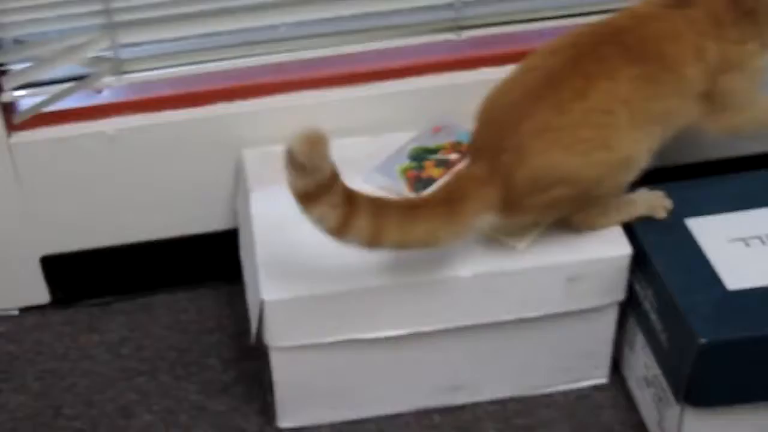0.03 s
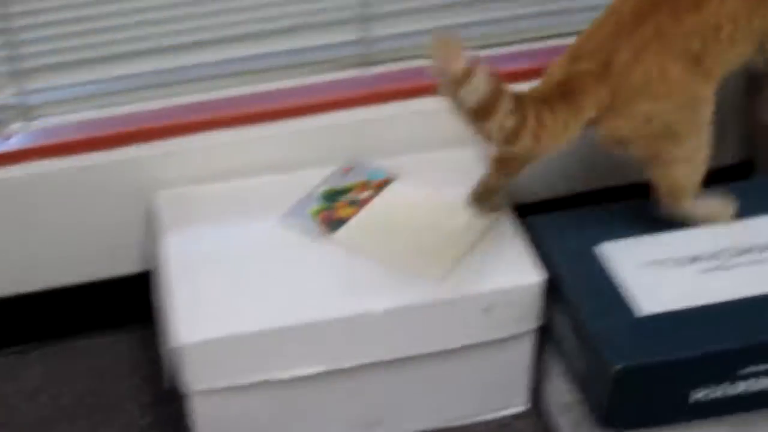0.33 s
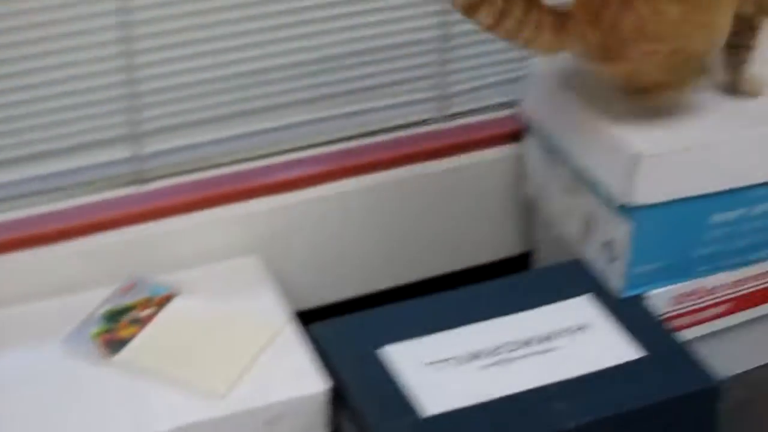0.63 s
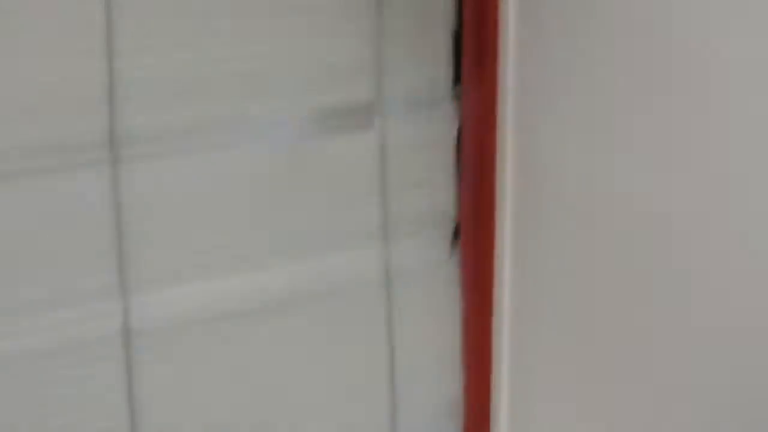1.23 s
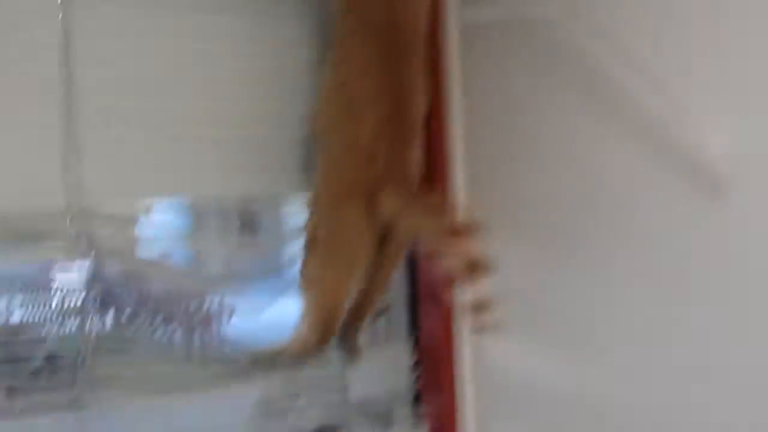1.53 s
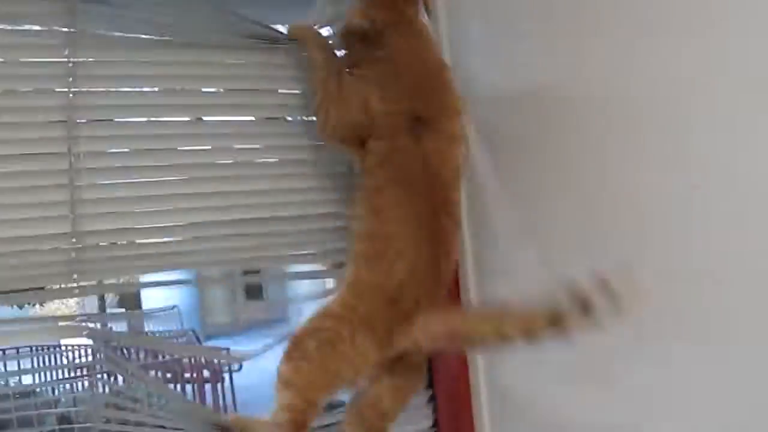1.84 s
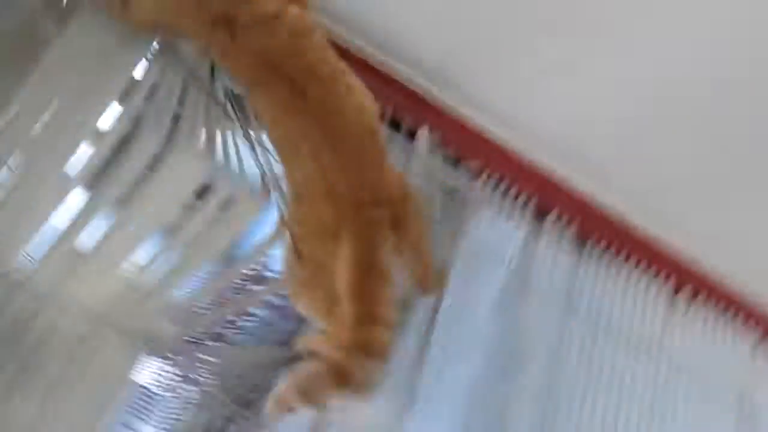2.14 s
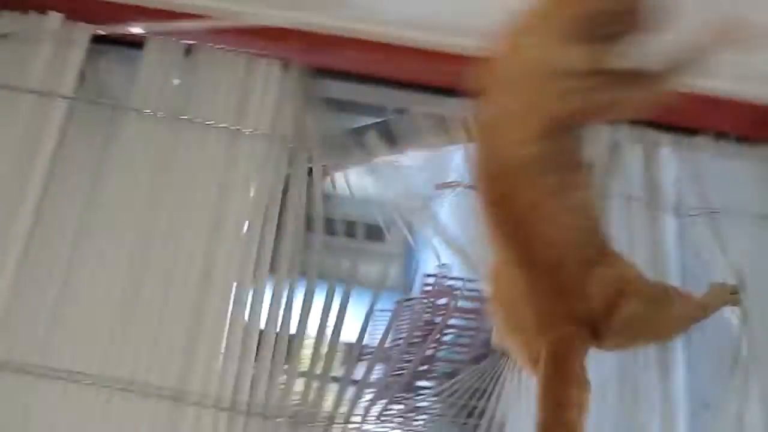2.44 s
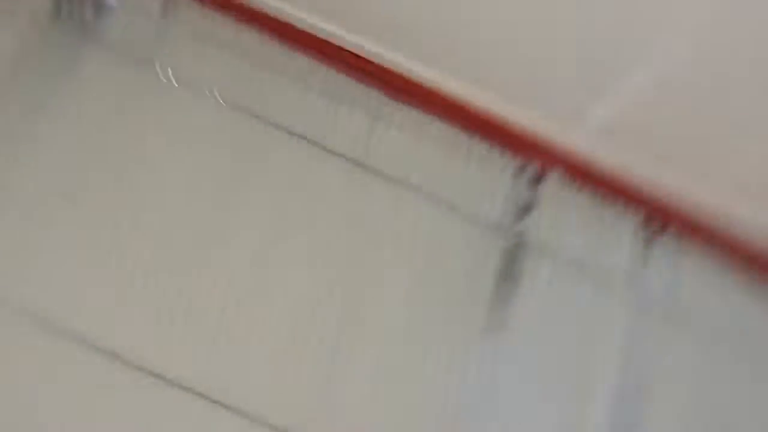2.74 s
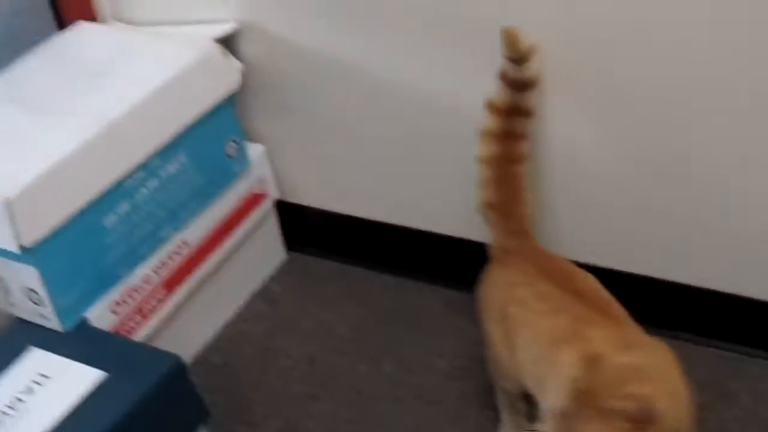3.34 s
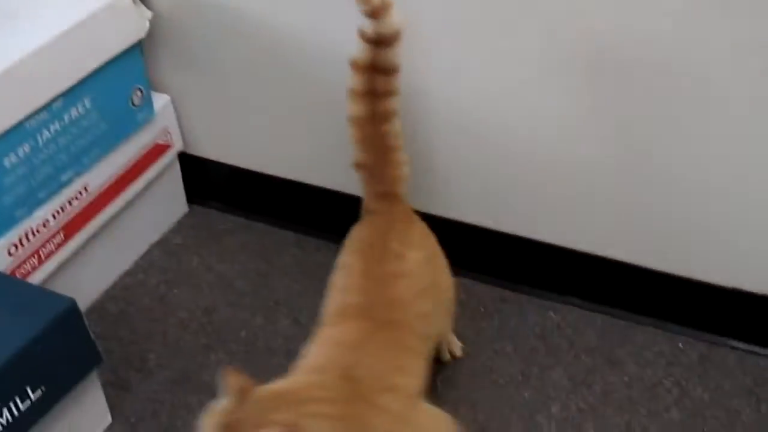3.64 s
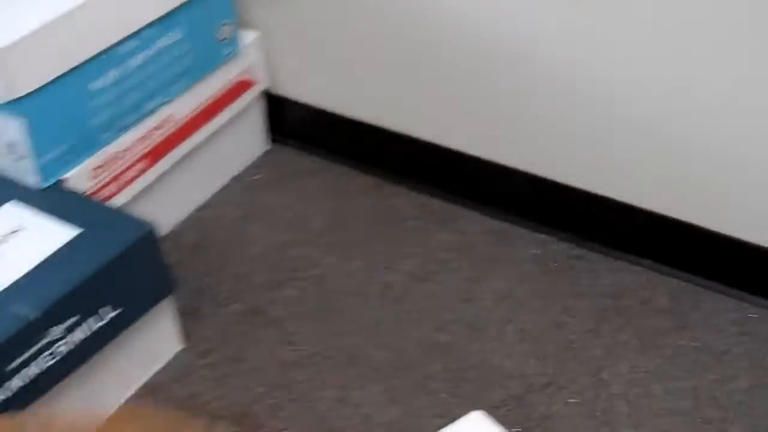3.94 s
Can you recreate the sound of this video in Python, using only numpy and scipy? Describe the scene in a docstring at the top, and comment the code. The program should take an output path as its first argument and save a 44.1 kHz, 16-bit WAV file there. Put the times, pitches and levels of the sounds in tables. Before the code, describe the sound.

A metal window blind clatters in dense bursts as a cat scrambles up it, just after thumping across cardboard boxes in a small office. The cat lands softly on carpet, and a smooth sliding hiss swells.

```python
"""A small office: a cat bounds over cardboard boxes, leaps into a metal window blind and scrambles up.
Paws thump the lids; the slats clash in dense bursts, snap, squeak and ring the head rail,
and the blind bumps the window. The cat drops back down to the carpet,
and a smooth sliding hiss with a faint sinking hum swells up."""
import sys
import numpy as np
from scipy import signal
from scipy.fft import rfft, irfft
from scipy.io import wavfile
from scipy.ndimage import uniform_filter1d, minimum_filter1d

SR = 44100
rng = np.random.default_rng(int(sys.argv[2]) if len(sys.argv) > 2 else 0)


def put_to_file(sound):
    """Save the sound as 16-bit audio at rate SR, in the file named by the first command-line argument."""
    columns = np.atleast_2d(sound).T  # one column per channel
    safe = np.clip(columns, -1, 1)
    whole_steps = np.round(safe * 32767)
    wavfile.write(sys.argv[1], SR, whole_steps.astype(np.int16))


N = 176400
T = np.arange(N) / SR

# Dull knock of paws and window bumps. Each row: frequency in Hz, relative level in dB.
KNOCK_SPECTRUM = [(35, -20), (80, -41), (120, -6), (230, -1.5), (320, -4), (540, -2.5), (750, -8.5),
                  (1100, -11.5), (1800, -22.5), (4000, -52.5)]


def undb(db):
    return 10 ** (np.asarray(db) / 20)


def unit(x):
    """Scale to rms 1."""
    return x / np.sqrt(np.mean(x ** 2))


def curve(rows, column=1):
    """One table column, linearly interpolated in time."""
    rows = np.array(rows)
    return np.interp(T, rows[:, 0], rows[:, column])


def add(out, start_s, sound):
    start = int(start_s * SR)
    out[start:start + len(sound)] += sound[:N - start]


def convolve(x, response):
    return signal.fftconvolve(x, response)[:N]


def colour(x, spectrum, keep_power=True):
    """Minimum-phase filter through (Hz, dB) points."""
    size = 4096
    hz, db = np.array(spectrum).T
    gain = undb(np.interp(np.log(np.fft.rfftfreq(size, 1 / SR) + 1), np.log(hz), db))
    cepstrum = irfft(np.log(unit(gain) if keep_power else gain))
    cepstrum[1:size // 2] *= 2
    cepstrum[size // 2 + 1:] = 0
    return convolve(x, irfft(np.exp(rfft(cepstrum))))


def clicks(per_s, scatter_db):
    """Random contacts of uneven size, with steady power over 40 ms."""
    hits = rng.random(N) < per_s / SR
    x = hits * undb(scatter_db * rng.standard_normal(N)) * rng.choice([-1, 1], N)
    return x / np.sqrt(uniform_filter1d(x ** 2, size=1764) + 1e-4)


def ring(modes):
    """Half a second of decaying modes (Hz, dB, t60 s)."""
    t = T[:SR // 2]
    return sum(undb(db) * np.sin(2 * np.pi * hz * t) * np.exp(-np.log(1000) * t / t60_s)
               for hz, db, t60_s in modes)


def bursts(contacts, swell_share=0):
    """Decaying noise per contact (start s, dB, decay s), swelling for a share of its decay."""
    power = np.zeros(N)
    t = T[:SR // 2]
    for start_s, db, decay_s in contacts:
        swell = np.minimum(t / (swell_share * decay_s + 1 / SR), 1)
        add(power, start_s, (undb(db) * swell * np.exp(-t / decay_s)) ** 2)
    return np.sqrt(power) * rng.standard_normal(N)


def waver(smooth_samples, length=N):
    """Smoothed noise, rms 1."""
    return unit(uniform_filter1d(rng.standard_normal(length), size=smooth_samples))


def tail(decay_s):
    """Scattered reflections with unit energy."""
    t = T[:SR // 2]
    response = rng.standard_normal(len(t)) * np.exp(-t / decay_s) * (1 - np.exp(-t * 10 / decay_s))
    return response / np.sqrt(np.sum(response ** 2))


def brushing():
    """Fur and feet brush the boxes between steps."""
    # Each row: time in seconds, level in dB.
    levels = [(.16, -100), (.178, -29.5), (.27, -36), (.33, -40.5), (.39, -34.5), (.46, -44), (.68, -45.5),
              (.95, -32.5), (1.05, -43)]
    # Each row: frequency in Hz, relative level in dB.
    spectrum = [(50, -21), (170, 9), (400, 7.5), (900, 1.5), (2700, -5), (4000, -15), (5500, -9.5),
                (8000, -12.5), (15000, -36)]
    touching = (T > levels[0][0]) & (T < levels[-1][0])
    return colour(clicks(per_s=3000, scatter_db=5.2) * undb(curve(levels)) * touching, spectrum)


def paws():
    """Paws boom, knock and scuff the box lids; the last two steps thud softly and scuff on the carpet."""
    # Each row: start in seconds, pitch in Hz, boom, knock and scuff in dB, contact in seconds.
    steps = [(.199, 216, -35, -19.5, -39, 0.0054), (0.292, 193, -25, -25, -30, 0.015),
             (0.399, 225, -27, -18.5, -26, 0.0032), (0.421, 187, -21, -47, -53, 0.0053),
             (.539, 175, -10.5, -17.5, -23, 0.0082), (0.697, 277, -17.5, -22.5, -33.5, 0.007),
             (.749, 192, -6, -11, -15.5, 0.0035), (0.807, 204, -29, -16.5, -20.5, 0.003),
             (0.874, 145, -16.5, -16.5, -21, 0.0066), (.990, 289, -10.5, -21, -21.5, 0.0085),
             (0.998, 149, -14.5, -19.5, -17, 0.017), (3.108, 534, -27, -36.5, -36.5, 0.054),
             (3.225, 426, -54, -58, -34.5, 0.015)]
    # Each row: multiple of the step's pitch, level in dB, t60 in seconds.
    boom_modes = [(0.602, -28, 0.65), (.82, -35, 0.28), (0.998, 1.5, 0.091), (1.27, -9, 0.18),
                  (2.72, -13, 0.17)]
    # Each row: frequency in Hz, relative level in dB.
    scuff_spectrum = [(300, -42), (900, -9), (1600, 6.5), (2600, 3), (4000, -13), (5500, -5.5), (8500, -14),
                      (15000, -40)]
    swell_share = 0.044  # padded paws press in gradually
    boom, knocks, scuffs = np.zeros(N), [], []
    for start_s, pitch_hz, boom_db, knock_db, scuff_db, contact_s in steps:
        modes = [(pitch_hz * ratio, db, t60_s) for ratio, db, t60_s in boom_modes]
        add(boom, start_s, undb(boom_db) * ring(modes))
        knocks.append((start_s, knock_db, 3.2 * contact_s))
        scuffs.append((start_s, scuff_db, contact_s))
    knock = colour(bursts(knocks, swell_share), KNOCK_SPECTRUM)
    scuff = colour(bursts(scuffs, swell_share), scuff_spectrum)
    return boom + knock + scuff


def snaps():
    """Claws and slats snap: short, bright noise bursts."""
    # Each row: start in seconds, level in dB, decay in seconds.
    contacts = [(.369, -24, 0.0061), (.411, -25, 0.0024), (.8067, -22.5, 0.002), (.969, -28, 0.018),
                (1.177, -10, 0.019), (1.222, -7.5, 0.0075), (1.558, -3.5, 0.0063), (1.592, -9, 0.0048),
                (1.741, -12, 0.025), (2.055, -8, 0.0049), (2.345, -18.5, 0.0077), (2.41, -15.5, 0.01)]
    # Each row: frequency in Hz, relative level in dB.
    spectrum = [(400, -15.5), (1400, -1.5), (2600, 4), (4000, -8.5), (5300, 0), (6400, 5), (8000, 0.5),
                (11000, -7.5), (15500, -22)]
    return colour(bursts(contacts), spectrum)


def squeaks():
    """Skidding claws and slat edges give thin, unsteady whistles with a weak octave."""
    # Each row: start and length in seconds, first and last pitch in Hz, level in dB.
    skids = [(0.802, 0.018, 7000, 6320, -32), (2.122, 0.0405, 6370, 6130, -21),
             (2.171, 0.096, 5830, 5800, -25.5), (2.64, 0.047, 9900, 10530, -22.5)]
    out = np.zeros(N)
    for start_s, length_s, first_hz, last_hz, db in skids:
        progress = np.clip((T - start_s) / length_s, 0, 1)
        pitch_hz = (first_hz + (last_hz - first_hz) * progress) * (1 + 0.03 * waver(40))
        phase = 2 * np.pi * np.cumsum(pitch_hz) / SR
        envelope = undb(db) * np.sqrt(np.abs(np.sin(np.pi * progress)))
        out += envelope * (np.sin(phase) + undb(-16) * np.sin(2 * phase))
    return out


def shaking():
    """Clash, clack and rattle envelopes: each pull or kick swells and settles; their powers add."""
    # Each row: start, rise and decay in seconds, then clash, clack and rattle in dB.
    shakes = [(0.973, 0.069, 0.07, -20, -22, -37), (1.101, 0.02, 0.083, -21, -24, -28.5),
              (1.197, 0.028, 0.099, -21.5, -20.5, -22), (1.365, 0.011, 0.017, -38, -25.5, -28.5),
              (1.473, 0.017, 0.61, -34.5, -33.5, -32.5), (1.581, 0.016, 0.062, -19.5, -20.5, -24.5),
              (1.673, 0.022, 0.069, -19.5, -17.5, -20.5), (1.74, 0.046, 0.07, -15, -21.5, -30.5),
              (1.871, 0.018, 0.063, -8.5, -13.5, -22), (1.935, 0.032, 0.083, -16.5, -22, -26.5),
              (2.05, 0.057, 0.095, -22.5, -23, -28), (2.17, 0.037, 0.12, -32, -34, -33),
              (2.335, 0.01, 0.17, -28.5, -34, -30.5), (2.411, 0.02, 0.16, -15.5, -17.5, -23),
              (2.424, 0.044, 0.038, -8.5, -12, -22), (2.519, 0.017, 0.091, -20, -21, -34),
              (2.63, 0.035, 0.39, -27, -32, -30), (2.712, 0.012, 0.062, -24, -22.5, -28),
              (2.824, 0.02, 0.082, -19, -22, -36.5), (2.899, 0.023, 0.041, -17.5, -22.5, -32)]
    rest_s = 0.27  # friction stops the slats about this long after a shake
    powers = np.zeros((3, N))
    t = T[:SR]
    for start_s, rise_s, decay_s, *levels_db in shakes:
        swell = np.minimum(t / rise_s, 1) ** 2
        settle = np.exp(-2 * np.maximum(t - rise_s, 0) / decay_s - (t / rest_s) ** 2)
        for power, db in zip(powers, levels_db):
            add(power, start_s, undb(db) ** 2 * swell * settle)
    return np.sqrt(powers)


def sway(depth_db=2, step_s=0.015):
    """Gain that wanders as slats meet and part."""
    knots = rng.standard_normal(1024)
    return undb(depth_db * np.interp(T / step_s, np.arange(len(knots)), knots))


def slats():
    """Shaken slats clash and clack in dense showers and rattle against the frame."""
    # Treble, mid and low spectra. Each row: frequency in Hz, relative level in dB.
    clash_spectrum = [(1500, -31), (3000, -4), (4050, -12.5), (4800, -2.5), (6300, -0.5), (8800, -4),
                      (11500, -14), (13200, -14.5), (15500, -44)]
    clack_spectrum = [(700, -16.5), (1250, -1.5), (2000, 4.5), (2550, 2.5), (3200, 0.5), (3900, -10.5),
                      (6000, -31)]
    rattle_spectrum = [(40, -46), (85, -44.5), (120, -12.5), (250, -6), (650, 0.5), (1000, -5), (1400, -18),
                       (2500, -57)]
    clash_gain, clack_gain, rattle_gain = shaking()
    clash = colour(clicks(per_s=1500, scatter_db=3.8) * clash_gain * sway(), clash_spectrum)
    clack = colour(clicks(per_s=1000, scatter_db=3.8) * clack_gain, clack_spectrum)
    rattle = colour(clicks(per_s=900, scatter_db=3.7) * rattle_gain, rattle_spectrum)
    return clash + clack + rattle


def head_rail():
    """Each jolt rings the rail; its close modes beat, and the shifting load makes their pitch waver."""
    # Each row: start in seconds, level in dB.
    jolts = [(0.991, -12.5), (1.041, -12), (1.115, -9.5), (1.234, -9), (1.594, -10), (1.772, -6.5),
             (1.842, -15), (1.882, -8), (1.99, -12), (2.065, -15.5), (2.2, -23.5), (2.345, -22.5),
             (2.452, -9), (2.525, -5.5), (2.614, -19), (2.71, -11), (2.772, -11), (2.86, -13),
             (2.941, -17.5), (2.974, -19.5)]
    # Each row: frequency in Hz, level in dB, t60 in seconds.
    modes = [(1692, -2.5, .22), (1660, -9.5, .5), (1735, -7, .14)]
    rise_s, detune, roughness = 0.008, 0.007, 0.014
    out = np.zeros(N)
    t = T[:SR // 2]
    for start_s, db in jolts:
        speed = 1 + roughness * waver(300, len(t)) + detune * rng.standard_normal()
        ringing = np.interp(np.cumsum(speed) / SR, t, ring(modes))
        add(out, start_s, undb(db) * np.minimum(t / rise_s, 1) * ringing)
    return out


def window_bumps(t60_s=0.15):
    """The blind bumps the window: a dull knock with one short resonance."""
    # Each row: start in seconds, knock in dB, decay in seconds, pitch in Hz, ring in dB.
    blows = [(1.588, -25.5, 0.022, 445, -36), (1.705, -29, .012, 391, -14), (2.032, -19, 0.045, 307, -34),
             (2.07, -20, 0.047, 226, -19.5), (2.736, -20, 0.009, 429, -21.5)]
    out = colour(bursts([blow[:3] for blow in blows]), KNOCK_SPECTRUM)
    for start_s, _, _, hz, ring_db in blows:
        add(out, start_s, ring([(hz, ring_db, t60_s)]))
    return out


def sliding():
    """A smooth hiss with fine high chatter and a faint sinking hum."""
    # Each row: time in seconds, level in dB.
    hiss_levels = [(3.15, -56), (3.28, -42.5), (3.36, -35), (3.48, -33), (3.62, -29.5), (4.0, -31)]
    # Each row: frequency in Hz, relative level in dB.
    hiss_spectrum = [(60, -45), (130, -9), (300, -3), (520, -4.5), (800, 3.5), (1100, -3.5), (1720, 2),
                     (2100, -3), (3100, -3.5), (4200, -21), (4900, -6.5), (5350, 0), (6300, -8),
                     (8500, -10.5), (13500, -26), (15500, -56)]
    # Each row: time in seconds, pitch in Hz, level in dB.
    hum_track = [(3.3, 251, -59), (3.35, 247.6, -42.5), (3.68, 242, -37.5), (3.77, 238, -39),
                 (4.0, 225, -56)]
    chatter_hz, chatter_t60_s, chatter_db = 5000, 0.0089, -7
    tick = ring([(chatter_hz, 0, chatter_t60_s)])
    chatter = undb(chatter_db) * unit(convolve(clicks(per_s=170, scatter_db=1.8), tick))
    hiss = (colour(rng.standard_normal(N), hiss_spectrum) + chatter) * undb(curve(hiss_levels))
    hum_hz = curve(hum_track) * (1 + 0.043 * waver(400))
    hum = np.sin(2 * np.pi * np.cumsum(hum_hz) / SR) * undb(curve(hum_track, column=2))
    fade_in = np.clip((T - hiss_levels[0][0]) / 0.05, 0, 1)
    return (hiss + hum) * fade_in


def room(direct, scattered, wet_db, split_hz):
    """Direct and side-scattered sound plus a tail whose treble dies first; wider towards the treble."""
    # Each row: frequency in Hz, side-channel gain in dB.
    side_spectrum = [(60, -15), (1000, -17.5), (2200, -15.5), (4000, -10.5), (6000, -8.5), (8500, -6),
                     (12000, -0.5)]

    def band_tail(kind, t60_s):
        sos = signal.butter(2, split_hz, kind, fs=SR, output="sos")
        return signal.sosfilt(sos, tail(t60_s / np.log(1000)))

    def reflections(x):
        return undb(wet_db) * convolve(x, band_tail("low", t60_s=0.41) + band_tail("high", t60_s=0.17))

    mid = direct + reflections(scattered)
    side = colour(scattered + reflections(direct), side_spectrum, keep_power=False)
    return np.array([mid + side, mid - side]) / np.sqrt(1 + undb(2 * wet_db))


def scene():
    """Thumps and clatter in the office, in stereo."""
    def clatter():
        return slats() + head_rail() + snaps() + squeaks() + sliding()

    thumps = paws() + brushing() + window_bumps()
    early = convolve(thumps, tail(decay_s=0.003))
    room_thumps = room(thumps, early, wet_db=-3, split_hz=420)  # near the carpet only the bass lingers
    room_clatter = room(clatter(), clatter(), wet_db=-0.5, split_hz=2670)  # two draws for width
    return room_thumps + room_clatter


def record(dry):
    """The small microphone loses the deep bass; a fast limiter holds the peaks; the top is cut."""
    low_hz, top_hz, limiter_samples = 113, 15600, 128
    thin = signal.sosfilt(signal.butter(2, low_hz, "high", fs=SR, output="sos"), dry)
    peak = np.maximum(np.abs(thin).max(axis=0), 1)
    gain = uniform_filter1d(minimum_filter1d(1 / peak, limiter_samples), limiter_samples)
    return signal.sosfilt(signal.ellip(10, 0.1, 90, top_hz, fs=SR, output="sos"), thin * gain)


dry = scene()
out = record(dry)
put_to_file(out)
```